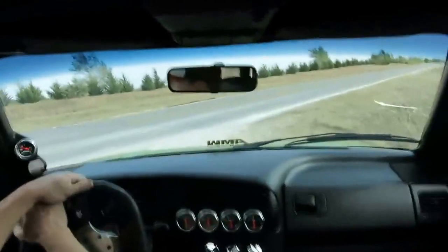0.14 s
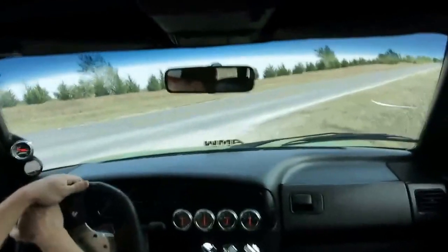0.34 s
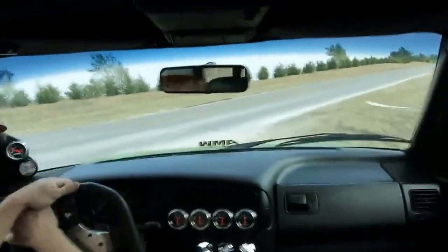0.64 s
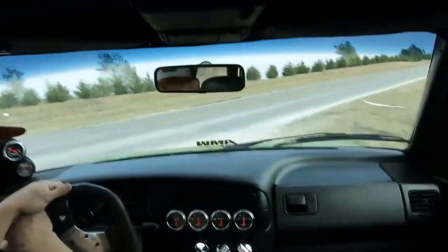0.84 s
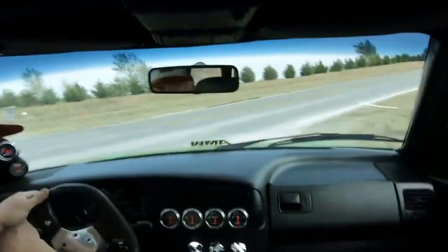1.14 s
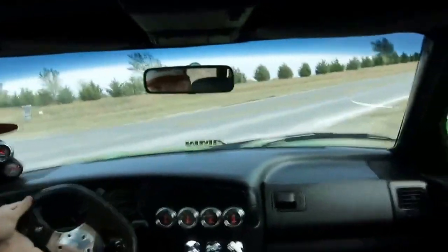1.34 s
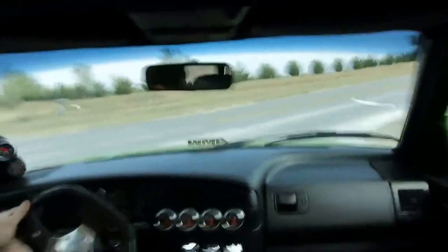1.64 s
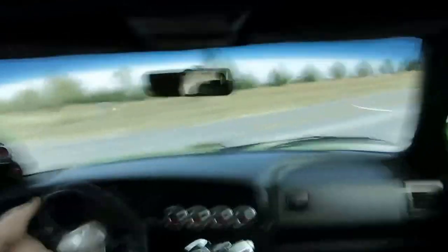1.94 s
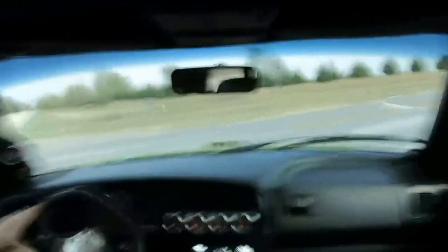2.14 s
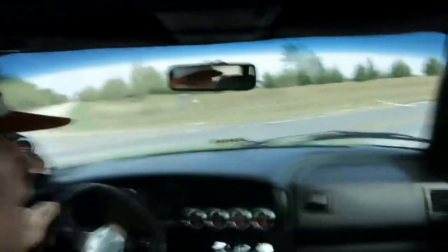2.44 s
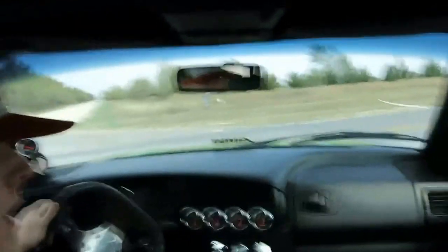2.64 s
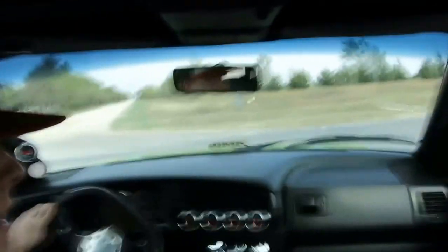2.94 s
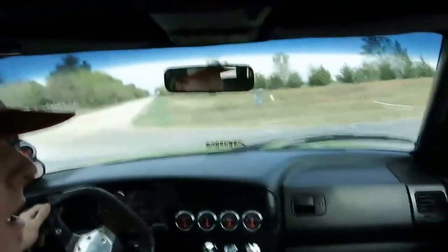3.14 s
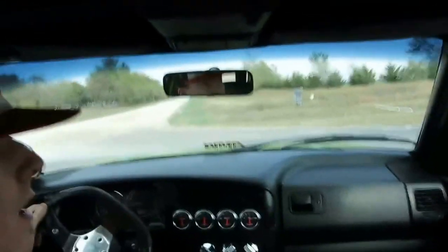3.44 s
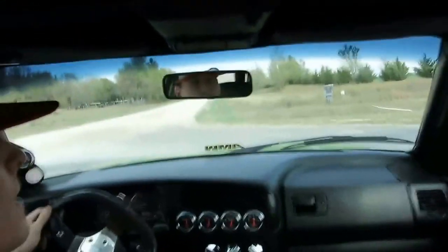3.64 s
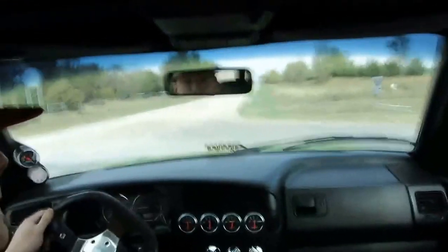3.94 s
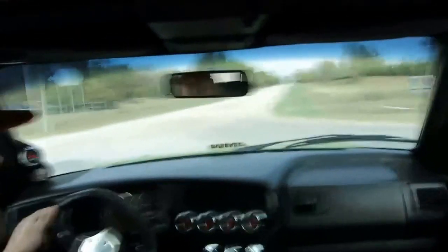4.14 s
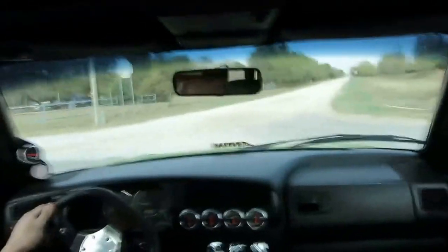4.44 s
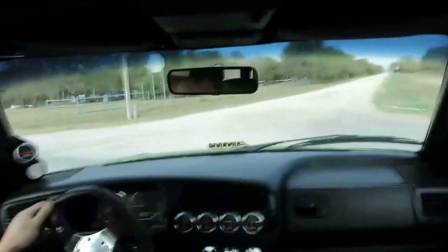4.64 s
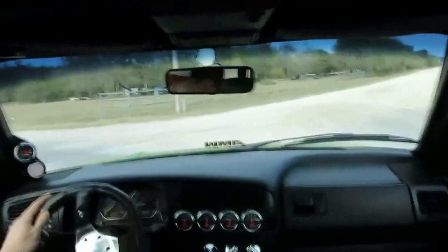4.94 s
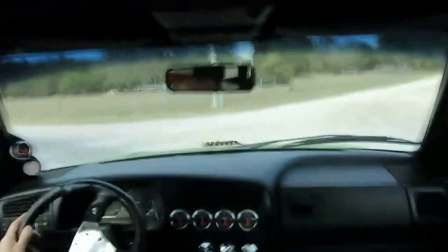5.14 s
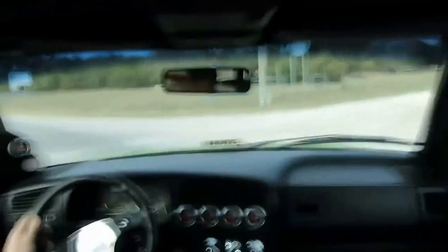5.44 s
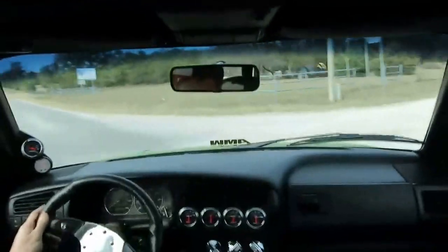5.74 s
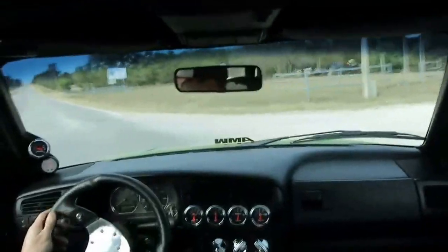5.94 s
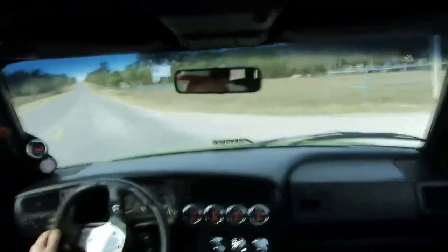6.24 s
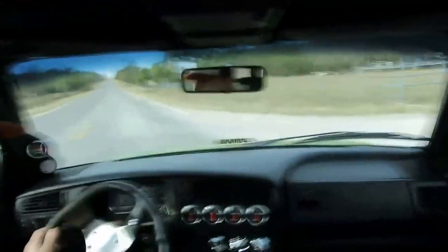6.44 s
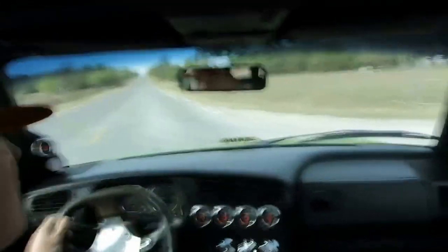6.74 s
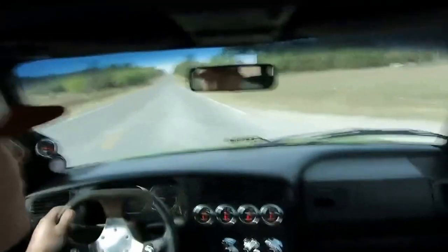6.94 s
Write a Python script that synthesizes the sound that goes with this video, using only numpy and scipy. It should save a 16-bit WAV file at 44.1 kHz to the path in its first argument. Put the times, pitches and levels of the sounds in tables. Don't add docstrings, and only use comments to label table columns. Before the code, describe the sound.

Inside a moving car, the engine throbs deeply at low revs, sagging, then surging and dropping again before a last steady climb. Low road rumble lies beneath. Trim ticks and rattles; the recorder's housing buzzes and breaks into fast knocking, first long and uneven, then briefly, then in a steady late burst. Faint hiss, blower whine and soft air puffs. Close stereo cabin microphone, shaken by its mount.

```python
import sys
import numpy as np
from scipy import signal
from scipy.fft import rfft, irfft, next_fast_len
from scipy.io import wavfile
from scipy.ndimage import uniform_filter1d

SR = 44100
rng = np.random.default_rng(int(sys.argv[2]) if len(sys.argv) > 2 else 0)


def ratio_of_db(decibels):
    return 10 ** (np.asarray(decibels, float) / 20)


def master(y):
    cut = np.clip(np.atleast_2d(y).T, -1, 1)
    pcm = np.round(cut * 32767)
    wavfile.write(sys.argv[1], SR, pcm.astype(np.int16))


N = 313103

# t/s, engine cycles f/Hz
REVS = [(0, 43.7), (.99, 38.5), (1.36, 38.1), (1.54, 36.8), (1.86, 29.9), (2.04, 37.8), (2.33, 47.1),
        (2.42, 48.7), (2.82, 46.3), (3.32, 40.1), (3.53, 38.9), (3.97, 51.9), (4.55, 40.1), (4.81, 35.6),
        (5.5, 41.5), (6.21, 47.3), (6.78, 51.6), (7.1, 53.7)]
FLYWHEEL_S = .11
# t/s, level/dB
ENGINE_LEVEL = [(0.0, -23.5), (0.02, -22), (0.59, -20.5), (1.1, -22), (1.52, -21.5), (1.56, -25), (1.86, -30),
                (1.94, -33.5), (2.29, -24), (3.08, -29.5), (3.54, -28.5), (3.85, -22), (4.37, -29.5), (4.73, -31),
                (6.13, -19.5), (6.45, -28.5), (7.08, -27.5), (7.1, -27)]
# order number, level/dB
FIRING = [(5, 0), (6, -3), (7, 2), (8, -1), (9, -3), (10, 3), (11, -2)]
# f/Hz, level/dB
CABIN = [(120, 13), (165, 0), (225, 6.5), (262, -7.5), (300, -7.5), (345, -19.5), (390, -10.5),
         (430, -34.5), (462, -12), (520, -42.5), (700, -16.5)]
# f/Hz, level/dB
BOOM = [(31, -4.5), (38, -3), (44, -3.5), (49, -5.5), (65, -7.5), (78, -1.5), (94, -0.5), (107, 9.5)]
# f/Hz, level/dB
THIRD_ORDER = [(93, 4), (104, 10.5), (114, 6.5), (122, 1), (130, 6.5), (140, 4.5), (150, 1), (161, 2)]
# f/Hz, left minus right level/dB, left ahead by phase/rad
MICROPHONES = [(35, -8, 1.1), (46, -5, 1.05), (52, -4, .55), (80, -3, .85), (125, 1, .7), (170, 0, .3),
               (230, 2, .1), (300, 3, .2), (500, 0, .5)]
THROB_RAD = -2.2
# cycle f/Hz, phase/rad
SECOND_LEAD = [(38, 0), (46, .7), (53, 0)]
# cycle f/Hz, phase/rad
UPPER_LAG = [(38, .2), (47, .4), (53, 1.7)]

# f/Hz, level/dB per Hz
RUMBLE_COLOUR = [(20, -21.5), (60, -15.5), (130, -11.5), (230, -11), (300, -15), (450, -21.5), (700, -28),
                 (1500, -40), (2330, -45), (3000, -51.5), (5000, -76)]

# t/s, level/dB
LOOSE = [(0, -57), (.41, -51), (.8, -39.5), (1.48, -46), (1.72, -54.5), (2.35, -43), (2.8, -44),
         (3.08, -64), (3.5, -51), (3.82, -60), (4.21, -45), (4.6, -59.5), (5.02, -63), (5.2, -49),
         (5.95, -62.5), (6.41, -48), (6.8, -44.5), (7.1, -60)]
# f/Hz, level/dB, 60 dB fade t/s
SHELL = [(370, 3, .03), (560, -3, .025), (730, -7, .025), (880, 0, .025), (1090, -1, .025), (1320, 0, .03),
         (1640, -7, .03), (1980, -6, .025), (2300, -11, .025), (2550, -11, .025), (2900, -18, .02)]
# f/Hz, level/dB, 60 dB fade t/s
HOUSING = [(864, 6.5, 0.028), (1220, -36.5, 0.0052), (1338, -2, 0.036), (1966, -8.5, 0.036),
           (360, -12, 0.062), (604, 2.5, 0.09), (830, -7.5, 0.011), (855, 3, 0.021), (1020, -16.5, 0.057),
           (1083, 4.5, 0.09), (1323, -3.5, 0.046), (1660, -6.5, 0.09), (2580, -23, 0.011)]
# f/Hz, level/dB, 60 dB fade t/s
TRIM = [(789, 4.5, 0.017), (1120, 4, 0.0053), (1930, -2.5, 0.0099), (2402, -15, 0.09), (2756, 3, 0.0071),
        (3180, -12, 0.041), (4680, -6, 0.0036)]
LONGEST_RING_S = .024
BUZZ_DB, BUZZ_FOLLOWS, BUZZ_ENGINE = -34.5, 0.68, 0.46
LOOSEST_DB = -26
HISS_DB, HISS_ENGINE, HISS_LOOSE = -64.5, 0.87, 0.19
# f/Hz, level/dB per Hz
HISS_COLOUR = [(2500, -30), (4000, -3), (5000, 1), (8000, -3), (12500, 0.5), (16000, -9)]
WHINE_HZ, WHINE_WIDTH_HZ, WHINE_DB = 2312, 48, -66.5

# t/s, peak level/dB
TICKS = [(.329, -55.5), (0.518, -40.5), (0.677, -40.5), (0.701, -36.5), (0.75, -42.5), (0.854, -42),
         (1.059, -40), (1.26, -44), (2.975, -53.5), (3.035, -43), (3.286, -47), (3.596, -43),
         (4.681, -47.5), (4.763, -44), (5.506, -41.5), (5.751, -44), (5.971, -43), (7.068, -39)]
# f/Hz, level/dB per Hz
TICK_COLOUR = [(1500, -22.0), (2800, 5.5), (3800, -3.0), (5500, 3), (8000, -3.5), (11000, -2.5),
               (14500, -2.5), (16500, -16.0)]

# start t/s, end t/s
BOUTS = [
    (1.665, 2.93),
    (3.98, 4.39),
    (6.2, 6.83),
]
# first t/s, last t/s, touches per second f/Hz, knock level/dB, tick level/dB
RUNS = [(1.67, 1.825, 65, -16.5, -42), (1.702, 1.737, 50, -13, -38.5), (1.851, 2.045, 32, -17, -40.5),
        (1.846, 2.096, 32, -16, -42.5), (2.114, 2.194, 52, -21, -46.5), (2.222, 2.327, 30, -17, -40),
        (2.391, 2.514, 16, -21.5, -39.5), (2.361, 2.48, 16, -33.5, -53), (2.528, 2.573, 24, -14.5, -37.5),
        (2.594, 2.767, 47.5, -17.5, -39), (2.789, 2.849, 48, -17, -42.5), (2.885, 2.919, 30, -20.5, -45),
        (3.867, 3.959, 50, -27, -57), (3.986, 3.989, 49, -11, -39), (4.011, 4.13, 49.5, -16, -39),
        (4.167, 4.229, 16, -15.5, -39), (4.150, 4.255, 50, -28, -52), (4.273, 4.359, 47, -15, -38),
        (4.374, 4.46, 46, -30, -53.5), (6.171, 6.245, 48, -22, -45.5), (6.27, 6.273, 48, -10, -41.5),
        (6.292, 6.767, 48.8, -15.5, -40), (6.81, 6.862, 48, -22.5, -52), (6.903, 7.049, 27, -22, -46.5)]
KNOCK_SPREAD_DB, TICK_SPREAD_DB, KNOCK_LEAD_S = 1.3, 3.5, .001

# middle t/s, half length t/s, level/dB
PUFFS = [
    (4.79, 0.044, -61.5),
    (5.062, 0.082, -57.5),
    (5.207, 0.065, -59),
    (5.328, 0.034, -58),
    (5.583, 0.078, -57),
    (6.031, 0.089, -53.5),
    (6.304, 0.056, -62),
]
# f/Hz, level/dB per Hz
AIR_COLOUR = [(2120, -40), (3600, -12.5), (4440, -2.5), (6730, -2.5), (8100, 1), (12900, 0.5), (14600, 2),
              (15800, -14)]


def rms_one(x):
    return x / np.sqrt(np.mean(x ** 2) + 1e-20)


def in_time(rows):
    s, *columns = np.transpose(rows)
    return [np.interp(np.arange(N) / SR, s, c) for c in columns]


def at_hz(points, hz, column=1):
    points = np.array(points)
    return np.interp(np.log(hz), np.log(points[:, 0]), points[:, column])


def fade(t60):
    return ratio_of_db(-60 / (t60 * SR))


def drift(rate):
    r = np.exp(-80 * np.pi * rate / SR)
    slow = signal.lfilter([1], [1, -2 * r, r * r], rng.standard_normal(N // 40 + 2002))
    slow = slow[2000:]
    return np.interp(np.arange(N) / 40, np.arange(len(slow)), rms_one(slow))


def noise(colour, alike):
    size = next_fast_len(N)
    gain = ratio_of_db(at_hz(colour, np.arange(size // 2 + 1) * SR / size + 1))
    mid, side = irfft(rfft(rng.standard_normal((2, size))) * gain, size)[:, :N]
    alike = np.clip(alike, -1, 1)
    return rms_one(np.sqrt(1 + alike) * mid + np.sqrt(1 - alike) * side * [[1], [-1]])


def struck(clicks, modes, soft_hz):
    out, at = np.zeros(N), np.flatnonzero(clicks)
    for hz, level_db, t60 in modes:
        r = fade(np.clip(t60, .004, LONGEST_RING_S))
        w = 2 * np.pi * hz / SR
        strength = ratio_of_db(level_db + 2 * rng.standard_normal(len(at)))
        blows = np.full(N, 1e-18)
        blows[at] = clicks[at] * strength * rng.choice([-1, 1], len(at))
        out += signal.lfilter([0, np.sin(w)], [1, -2 * r * np.cos(w), r * r], blows)
    return signal.sosfilt(signal.butter(4, soft_hz, fs=SR, output="sos"), out)


def rocking(x):
    return x * ratio_of_db([[-.8], [.8]]) * [[1], [-1]]


def engine(cycle_hz, turns, engine_db):
    cycle_hz, turns, engine_db = cycle_hz[::8], turns[::8], engine_db[::8]
    orders = np.arange(1, 14)[:, None]
    hz = orders * cycle_hz
    gain = ratio_of_db(at_hz(CABIN, hz) + at_hz(FIRING, orders))
    counted = np.clip(hz[3:] / 20 - 7, 0, 1)
    gain[3:] *= ratio_of_db(engine_db) / np.sqrt(np.sum(gain[3:] ** 2 * counted, axis=0))
    gain[:2] = ratio_of_db(engine_db + at_hz(BOOM, hz[:2]))
    gain[2] = ratio_of_db(engine_db + at_hz(THIRD_ORDER, hz[2]))
    gain *= ratio_of_db(.09 * orders * [drift(14)[::8] for k in orders])
    phase = 2 * np.pi * orders * (turns + .0008 * drift(14)[::8]) + THROB_RAD
    phase[1] += at_hz(SECOND_LEAD, cycle_hz)
    phase[2:] -= at_hz(UPPER_LAG, cycle_hz)
    tilt_db = at_hz(MICROPHONES, hz) / 2
    lead = at_hz(MICROPHONES, hz, column=2)
    gain *= np.sqrt(8) / abs(ratio_of_db(tilt_db) * np.exp(1j * lead) + ratio_of_db(-tilt_db))
    left = np.sum(gain * ratio_of_db(tilt_db) * np.cos(phase + lead), axis=0)
    right = np.sum(gain * ratio_of_db(-tilt_db) * np.cos(phase), axis=0)
    return signal.resample_poly([left, right], 8, 1, axis=1, padtype="line")[:, :N]


def rumble(engine_swing, loose_swing):
    level_db = 0.67 * engine_swing + 0.14 * loose_swing - 32.5 + drift(15)
    return ratio_of_db(level_db) * noise(RUMBLE_COLOUR, alike=0.4)


def shaking(turns, clicks):
    part = (turns - .5) % 1
    cycle = np.floor(turns - .5).astype(int) + 2
    gate = (.25 + np.exp(-3.5 * part)) * ratio_of_db(1.1 * rng.standard_normal(500))[cycle]
    after = signal.lfilter([1], [1, -fade(.022)], clicks + 1e-18)
    for start, end in (np.array(BOUTS) * SR).astype(int):
        gate[start:end] = .3 + .6 * rms_one(after[start:end])
    return gate


def chatter(gate, modes, soft_hz):
    hit = rng.random(N) < 4000 / SR
    clicks = hit * ratio_of_db(2 * rng.exponential(1, N)) * rng.choice([-1, 1], N)
    return rms_one(struck(gate * clicks, modes, soft_hz))


def housing_buzz(gate, engine_swing, loose_swing):
    level_db = BUZZ_DB + BUZZ_FOLLOWS * loose_swing + BUZZ_ENGINE * engine_swing
    return rocking(ratio_of_db(np.minimum(level_db, LOOSEST_DB)) * chatter(gate, SHELL, soft_hz=3070))


def trim_rattle(gate, loose_db):
    return ratio_of_db(loose_db + 2) * chatter(gate * np.sqrt(gate), TRIM, soft_hz=6650)


def hiss(gate, engine_swing, loose_swing):
    level_db = HISS_DB + HISS_ENGINE * engine_swing + HISS_LOOSE * loose_swing + 1.5
    return ratio_of_db(level_db) * (.6 + .5 * gate) * noise(HISS_COLOUR, alike=.5) * ratio_of_db([[1], [-1]])


def whine():
    r = np.exp(-np.pi * WHINE_WIDTH_HZ / SR)
    poles = [1, -2 * r * np.cos(2 * np.pi * WHINE_HZ / SR), r * r]
    once = signal.lfilter([1, 0, -1], poles, rng.standard_normal(N))
    return ratio_of_db(WHINE_DB + drift(4)) * rms_one(signal.lfilter([1], poles, once))


def ticks(s, peak_db):
    clicks = np.full(N, 1e-18)
    clicks[(s * SR).astype(int)] = ratio_of_db(peak_db - 1)
    snap, tail, rise = fade(np.array([.011, .06, .005]))
    envelope = signal.lfilter([1], [1, -snap], clicks) + 0.054 * signal.lfilter([1], [1, -tail], clicks)
    envelope = signal.lfilter([1 - rise], [1, -rise], envelope)
    return envelope * noise(TICK_COLOUR, alike=0.58)


def touches():
    draw = rng.standard_normal((len(RUNS), 3, 30))
    rows = []
    for (first, last, rate, knock_db, tick_db), uneven in zip(RUNS, draw):
        count = round((last - first) * rate) + 1
        late, knock, tick = uneven[:, :count]
        s = np.linspace(first, last, count) + .001 * late
        rows += zip(s, knock_db + KNOCK_SPREAD_DB * knock, tick_db + TICK_SPREAD_DB * tick)
    return np.transpose(rows)


def contacts(s, knock_db):
    draw = rng.random((len(s), 8))
    clicks = np.zeros(N + SR)
    for k, bounce_db in enumerate([-1, 0, -5, -13]):
        uneven_s = .003 * (k > 0) * (draw[:, k] - .5)
        at = (s - KNOCK_LEAD_S + k * .0033 + uneven_s) * SR
        clicks[at.astype(int)] = ratio_of_db(knock_db + bounce_db - 4.5) * ratio_of_db(3 * (draw[:, 4 + k] - .5))
    return clicks[:N]


def knocks(clicks):
    opposite = struck(clicks, HOUSING, soft_hz=2540)
    shared = struck(clicks * rng.choice([-1, 1], N), HOUSING, soft_hz=3220)
    return rocking(opposite) + ratio_of_db(-16) * shared


def vent():
    t = np.arange(N) / SR
    swell = sum(ratio_of_db(db) ** 2 * np.exp(-((t - s) / half) ** 2) for s, half, db in PUFFS)
    return np.sqrt(swell) * noise(AIR_COLOUR, alike=0.45) * ratio_of_db([[1.2], [-1.2]])


def scene():
    (cycle_hz,), (engine_db,), (loose_db,) = in_time(REVS), in_time(ENGINE_LEVEL), in_time(LOOSE)
    cycle_hz = uniform_filter1d(cycle_hz, int(FLYWHEEL_S * SR), mode="nearest")
    turns = np.cumsum(cycle_hz) / SR + .23
    engine_swing, loose_swing = engine_db - engine_db.mean(), loose_db - loose_db.mean()
    s, knock_db, tick_db = touches()
    clicks = contacts(s, knock_db)
    gate = shaking(turns, clicks)

    mix = engine(cycle_hz, turns, engine_db) + rumble(engine_swing, loose_swing)
    mix += housing_buzz(gate, engine_swing, loose_swing) + trim_rattle(gate, loose_db)
    mix += hiss(gate, engine_swing, loose_swing) + whine()
    mix += ticks(*np.hstack([[s, tick_db], np.transpose(TICKS)]))
    return mix + knocks(clicks) + vent()


def top_cut(x):
    return signal.sosfilt(signal.butter(12, 15950, fs=SR, output="sos"), x)


def record(dry):
    ceiling = 1.05
    rounded = ceiling * np.tanh(dry / ceiling)
    mix = signal.sosfilt(signal.cheby2(12, 50, 16100, fs=SR, output="sos"), rounded)
    return top_cut(mix)


dry = scene()
out = record(dry)
master(out)
```